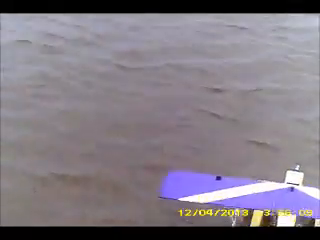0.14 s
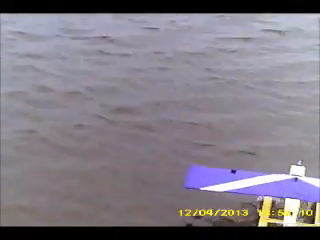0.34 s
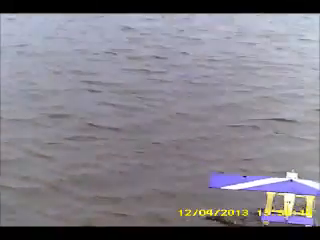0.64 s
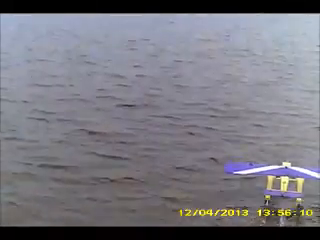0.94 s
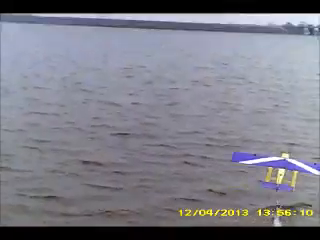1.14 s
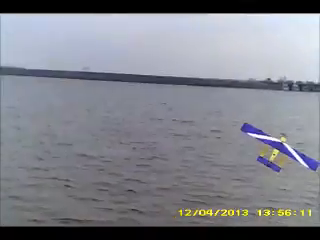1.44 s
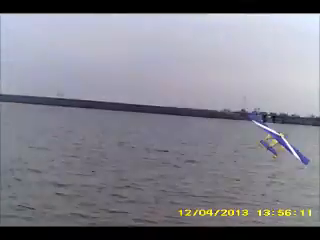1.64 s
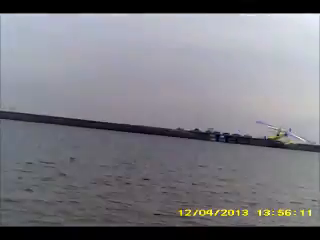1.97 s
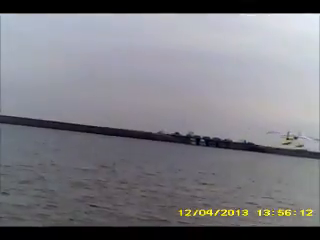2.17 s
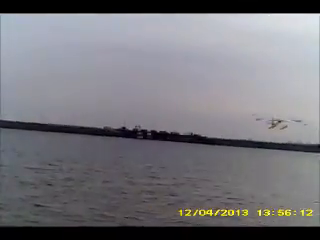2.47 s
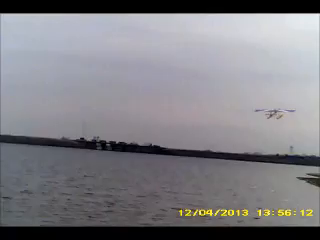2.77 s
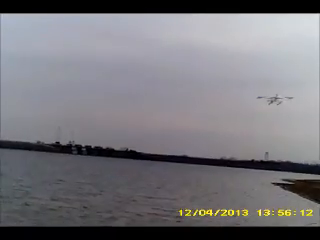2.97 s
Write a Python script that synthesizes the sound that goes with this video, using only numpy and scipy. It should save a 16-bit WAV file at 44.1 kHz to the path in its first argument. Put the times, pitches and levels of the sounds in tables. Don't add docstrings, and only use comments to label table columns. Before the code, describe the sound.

A toy float plane's bright motor buzz recedes across water, with splashes and wind buffeting the microphone

```python
import sys
import numpy as np
from scipy import signal
from scipy.fft import rfft, irfft, next_fast_len
from scipy.io import wavfile
from scipy.ndimage import uniform_filter1d, map_coordinates

SR = 44100
rng = np.random.default_rng(int(sys.argv[2]) if len(sys.argv) > 2 else 0)


def ratio_of_db(decibels):
    return 10 ** (np.asarray(decibels, float) / 20)


def transcribe(u):
    v = np.clip(np.atleast_2d(u).T, -1, 1)
    q = np.round(v * 32767).astype(np.int16)
    wavfile.write(sys.argv[1], SR, q)


N = 137151

# time_s, turns_hz
SHAFT_SPEED = [(0, 139.55), (.11, 139.3), (.4, 138.75), (.5, 138.4), (.62, 138.3), (.81, 137.6),
               (1.08, 137.1), (1.5, 136.95), (2.2, 136.65), (3.11, 136.75)]
# time_s, level_db
PLANE_LEVEL = [(0.01, -37), (0.14, -39.5), (0.59, -44), (0.7, -45), (1.56, -50), (1.71, -51.5),
               (1.9, -54.5), (2.5, -56), (2.83, -59.5), (3.09, -65)]
# time_s, gain_db
WHINE_SWELL = [(0, -7), (.11, 1.5), (.3, -3), (.43, -10), (.54, -2), (.8, -3), (.92, -13), (1.1, -1.5),
               (1.32, -10), (1.52, 0), (1.64, -11), (1.93, 1.5), (2.24, -7), (2.75, -2.5), (3.11, 0)]
# shaft_order, level_db over the rush, fade_ratio to that of the rush
BLADE_TONES = [(1, -10, 0.76), (2, 7, 1.82), (3, -2.5, 1.64), (4, -18, 1.2), (6, -10.5, 1.3),
               (8, -11.5, 1.2)]
# shaft_order, level_db over the rush
POLE_TONES = [(7, -14.5), (14, -15), (28, -26), (56, -47.5)]
# pitch_hz, level_db
RUSH_COLOUR = [(150, -12.5), (400, 2.5), (1100, 0), (2100, -7.5), (2700, -22), (5000, -29.5), (10000, -56),
               (10400, -62.5)]
# pitch_hz, width_hz, gain_db
PORT_RESONANCES = [(926, 87, 2), (1885, 169, 7.5), (3930, 252, 10.5), (5870, 190, 5.5), (7640, 560, 11),
                   (9600, 740, 16)]
# start_s, peak_db, pitch_hz
FLOAT_SLAPS = [(0.068, -22.5, 921), (0.26, -41.5, 765), (0.296, -26, 1100), (0.331, -23, 1140),
               (0.396, -28, 1034), (0.442, -31, 860), (0.486, -23.5, 952), (0.512, -24, 1974),
               (0.567, -27, 1868), (0.639, -22.5, 1628), (0.653, -24.5, 1960), (0.718, -28.5, 1764),
               (0.741, -25.5, 1120), (0.895, -38.5, 936), (0.983, -30, 1630), (1.067, -26, 1280),
               (1.203, -35, 958), (1.249, -29, 1480), (1.307, -42.5, 920), (1.446, -41, 1695)]
# start_s, peak_db
SPRAY_SPITS = [
    (0.0703, -36.5),
    (0.4435, -42),
    (0.4849, -45.5),
    (0.5784, -41),
    (0.7398, -43.5),
    (0.8944, -40.5),
    (1.064, -58),
]
# pitch_hz, level_db
LAKE_COLOUR = [(100, -2.5), (1000, 0), (2000, -3.5), (2700, -10), (4000, -20), (5500, -21), (10000, -33.5),
               (10400, -61)]
# time_s, strength_db, head_on_gain_db
WIND_GUSTS = [(0.01, -36, 0), (0.22, -38, 3), (0.65, -33, 1.5), (0.68, -35.5, -3), (1.33, -36.5, 1.5),
              (1.36, -37.5, 0.5), (1.39, -34.5, -0.5), (1.46, -37.5, -3), (1.5, -33, -4.5),
              (1.58, -34, 1.5), (1.7, -31.5, -1), (1.72, -32.5, 0), (2.01, -34.5, 1.5), (2.02, -31, -0.5),
              (2.58, -31.5, 1), (2.65, -27.5, 3), (2.7, -32.5, 0), (3.1, -25.5, 0)]
# pitch_hz, level_db
RUMBLE_COLOUR = [(15, 0), (35, -4), (80, 2), (160, -3), (300, -14), (500, -31), (1000, -37), (2300, -47.5)]
# pitch_hz, level_db
FLUTTER_COLOUR = [(90, -21), (190, 3), (300, -1.5), (480, -13), (1000, -21.5), (2000, -46.5)]
# pitch_hz, level_db rms
CAMERA_TONES = [(7350, -81), (7376, -89), (7298, -92), (7246, -95), (7324, -94), (7402, -94), (7428, -96),
                (10706, -86)]
# start_s, peak_db, pitch_hz, length_cycles
CASE_CREAKS = [(2.536, -30.5, 450, 1.2), (2.603, -27, 595, 1.3), (2.619, -13.5, 653, 2.8),
               (2.627, -25, 440, 2.7), (2.639, -14, 330, 0.63), (2.645, -35, 450, 0.94),
               (2.649, -13.5, 450, 0.51), (2.665, -17, 577, 0.69), (2.668, -20, 427, 1.2),
               (2.689, -16.5, 384, 1), (3.091, -27.5, 700, 4)]


def unit(x):
    return x / np.sqrt(np.mean(x ** 2) + 1e-20)


def along(points, hz):
    f, v = np.transpose(points)
    return np.interp(np.log(hz + 1), np.log(f + 1), v, right=-120)


def curve(rows):
    return np.interp(np.arange(N) / SR, *np.transpose(rows))


def wobble(rate_hz):
    return map_coordinates(rng.standard_normal(400), [np.arange(N) * rate_hz / SR])


def filtered(x, response):
    m = next_fast_len(N + 8192)
    return irfft(rfft(x, m) * response(np.fft.rfftfreq(m, 1 / SR)), m)[:N]


def patchy(colour, patchy_db, gate=1):
    z = signal.stft(rng.standard_normal(N + 512), nperseg=512)[2]
    field = uniform_filter1d(rng.standard_normal(z.shape), size=5, axis=0)
    field = uniform_filter1d(field, size=6, axis=1)
    x = signal.istft(z * ratio_of_db(patchy_db * unit(field)), nperseg=512)[1][:N]
    return unit(filtered(x * gate, lambda hz: ratio_of_db(along(colour, hz))))


def bursts(s, peak, hz, life_s, noisy):
    t = np.arange(2048) / SR
    u = t / life_s[:, None]
    ring = np.sin(2 * np.pi * hz[:, None] * t * (1 + 0.015 * u))
    ring = ring + noisy * rng.standard_normal((len(s), len(t)))
    rows = peak[:, None] * ring * 5 * u * np.exp(-2 * u)
    at = np.round(s * SR).astype(int)[:, None] + np.arange(len(t))
    return np.bincount(at.ravel(), rows.ravel(), N + 2 * len(t))[:N]


def through_port(x, share=1):
    def response(hz):
        db = sum(gain * np.exp(-.5 * ((hz - c) / w) ** 2) for c, w, gain in PORT_RESONANCES)
        return ratio_of_db(share * db)
    return filtered(x, response)


def shaft_angle():
    speed_hz = curve(SHAFT_SPEED) * (1 + 0.00017 * wobble(44))
    return 2 * np.pi * np.cumsum(speed_hz) / SR


def shaft_tone(turn, order, db, waver_db):
    gain = np.sqrt(2) * ratio_of_db(db + waver_db * wobble(20))
    return gain * np.sin(order * turn + rng.uniform(0, 4.68))


def propeller(turn, far_db):
    return sum(shaft_tone(turn, k, db + fade * far_db, 1.1) for k, db, fade in BLADE_TONES)


def motor_poles(turn, far_db):
    return ratio_of_db(far_db) * sum(shaft_tone(turn, k, db, 2) for k, db in POLE_TONES)


def motor_whine(turn, far_db):
    return ratio_of_db(0.58 * far_db + curve(WHINE_SWELL)) * shaft_tone(turn, 42, -25.5, 1.1)


def blade_rush(turn):
    chop = 0.22
    return ratio_of_db(2 + 0.99 * wobble(25)) * patchy(RUSH_COLOUR, 2.63, gate=1 + chop * np.cos(2 * turn))


def plane():
    level_db = curve(PLANE_LEVEL)
    far_db = level_db - level_db[0]
    turn = shaft_angle()
    tones = propeller(turn, far_db) + motor_poles(turn, far_db) + motor_whine(turn, far_db)
    return ratio_of_db(level_db[0]) * tones, ratio_of_db(level_db) * blade_rush(turn)


def float_slaps():
    s, db, hz = np.transpose(FLOAT_SLAPS)
    life_s = np.full(len(s), 0.014 / 2)
    return bursts(s - .002, ratio_of_db(db - 5.5), hz, life_s, 2.15)


def drops():
    drops_per_s, pitch_hz, level_db, lift_off_s = 110, 1555, -10, 1.8
    draw = rng.random((300, 3))
    s = np.cumsum(-np.log(draw[:, 0] + 1e-9)) / drops_per_s
    db = np.interp(s, *np.transpose(PLANE_LEVEL)) + level_db
    db = db - 6.3 * np.log(draw[:, 1] + 0.0089)
    size = ratio_of_db(db) / (1 + np.exp((s - lift_off_s) / 0.36))
    hz = pitch_hz * np.exp(1.1 * (draw[:, 2] - .5))
    return bursts(np.minimum(s, N / SR), size, hz, 2.1 / hz, 1.5)


def spray():
    water = float_slaps() + drops()
    return filtered(water, lambda f: ratio_of_db(along(RUSH_COLOUR, f)) / (1 + (f / 6000) ** 3))


def spits():
    s, db = np.transpose(SPRAY_SPITS)
    life_s = np.full(len(s), 0.0035)
    x = bursts(s - .001, ratio_of_db(db + 23), 0 * s, life_s, 1)
    return filtered(x, lambda f: ratio_of_db(along(RUSH_COLOUR, f)) / (1 + (2600 / (f + 1)) ** 6))


def lake():
    return ratio_of_db(-57) * through_port(patchy(LAKE_COLOUR, 0.59), share=0.25)


def evened(x, span_s):
    power = np.abs(uniform_filter1d(x ** 2, size=max(1, int(span_s * SR))))
    return unit(x / (power + .05) ** (.22 / 2))


def wind():
    s, strength, facing = np.transpose(WIND_GUSTS)
    db = curve(np.transpose([s, strength]))
    head_on_db = curve(np.transpose([s, facing]))
    rumble = evened(patchy(RUMBLE_COLOUR, 0.21), 0.12)
    lumps = ratio_of_db(1.5 * wobble(29.98))
    flutter = lumps * evened(patchy(FLUTTER_COLOUR, 1.3), 0.12)
    flutter_db = db.mean() - 6 + head_on_db + 1.48 * (db - db.mean())
    return ratio_of_db(db) * rumble + ratio_of_db(flutter_db) * flutter


def camera_tones():
    t = np.arange(N) / SR
    return sum(np.sqrt(2) * ratio_of_db(db) * np.sin(2 * np.pi * hz * t + rng.uniform(0, 6.7))
               for hz, db in CAMERA_TONES)


def case():
    s, db, hz, cycles = np.transpose(CASE_CREAKS)
    x = bursts(s - .001, ratio_of_db(db - 2.5), hz, 0.68 * cycles / hz, 0.57)
    return filtered(x, lambda f: 1 / (1 + (f / 1300) ** 4.5))


def scene():
    tones, rush = plane()
    air = through_port(rush + spray() + spits())
    return (air + lake() + tones + wind() + case())[None]


def treble_gaps(x):
    from_hz, to_hz, share, gap_db, scatter_db = 5200, 10200, .4, -30, 4
    hz, _, z = signal.stft(x, SR, nperseg=2048, noverlap=1536)

    def smooth(v):
        return uniform_filter1d(uniform_filter1d(v, size=3, axis=0), size=11, axis=1)

    db = 10 * np.log10(smooth(np.abs(z[0]) ** 2) + 1e-20)
    db = db + 3.5 * np.log2(hz[:, None] / from_hz + .01)
    db = db + scatter_db * unit(smooth(rng.standard_normal(db.shape)))
    band = (hz > from_hz) & (hz < to_hz)
    db = db - .5 * np.median(db[band], axis=0)
    drop = band[:, None] * (db < np.quantile(db[band], share))
    return signal.istft(z * ratio_of_db(gap_db * drop), SR, nperseg=2048, noverlap=1536)[1][:, :N]


def low_pass(x):
    return signal.sosfilt(signal.butter(12, 10917, fs=SR, output="sos"), x)


def record(dry):
    mix = treble_gaps(dry - dry.mean() + camera_tones()) - .0012
    return low_pass(mix)


dry = scene()
out = record(dry)
transcribe(out)
```